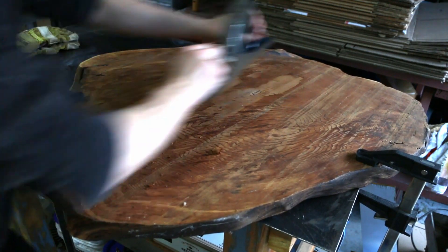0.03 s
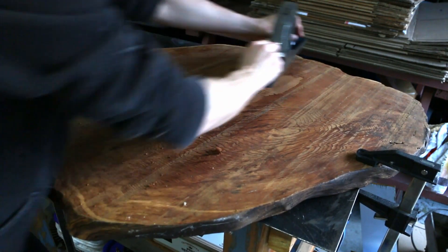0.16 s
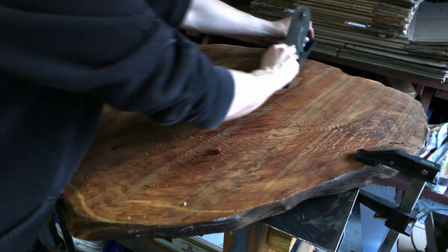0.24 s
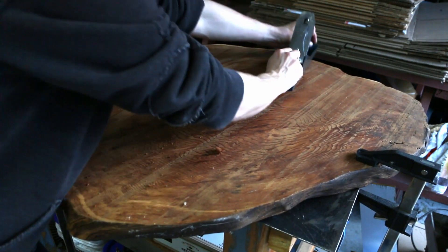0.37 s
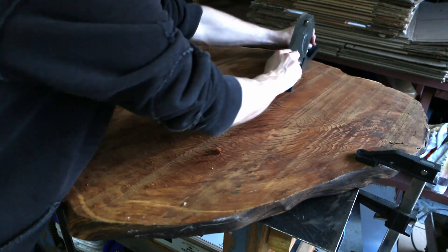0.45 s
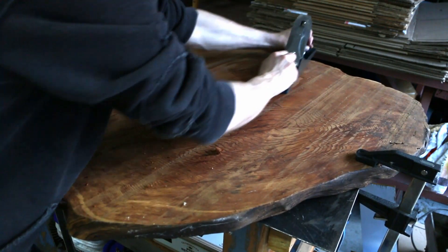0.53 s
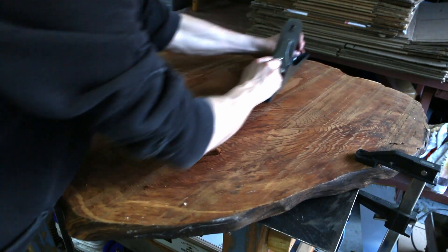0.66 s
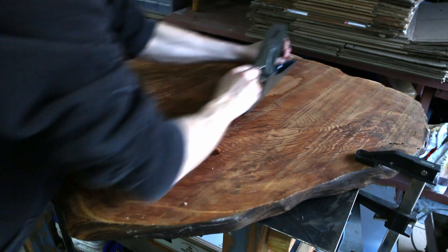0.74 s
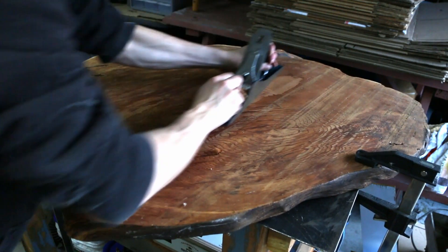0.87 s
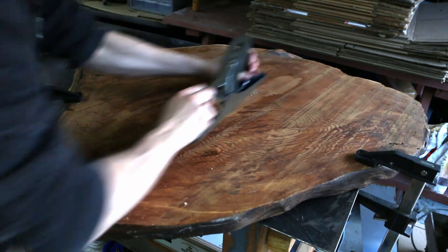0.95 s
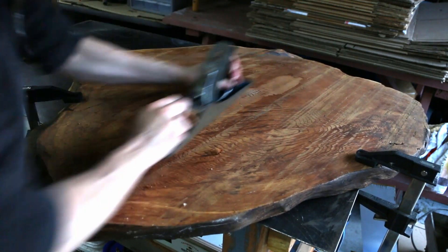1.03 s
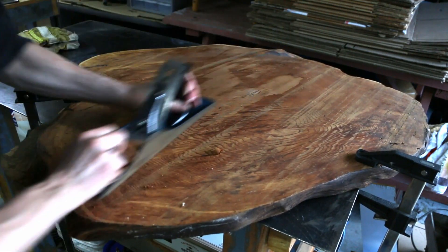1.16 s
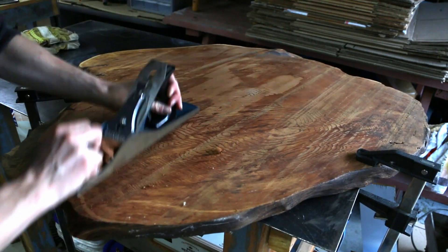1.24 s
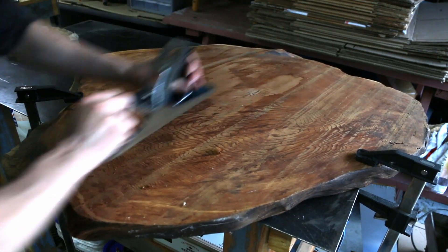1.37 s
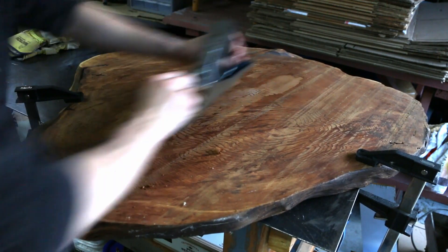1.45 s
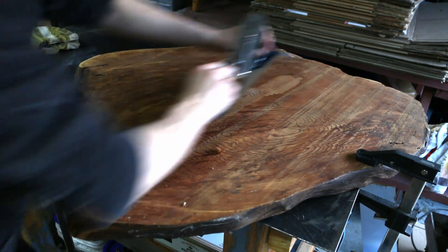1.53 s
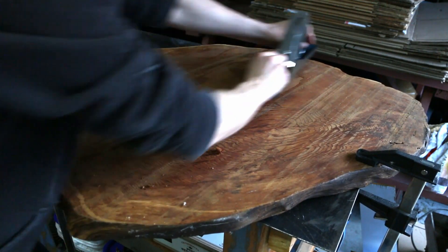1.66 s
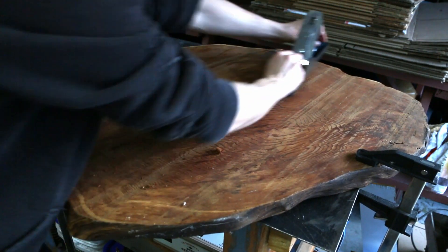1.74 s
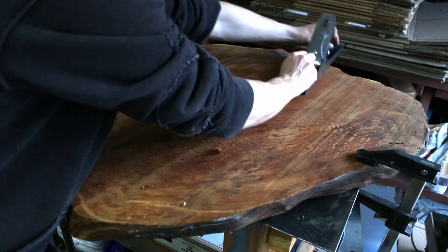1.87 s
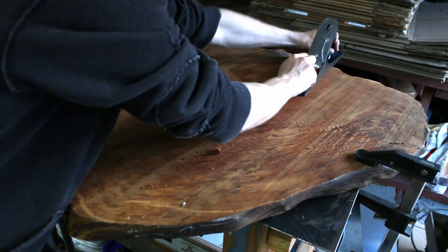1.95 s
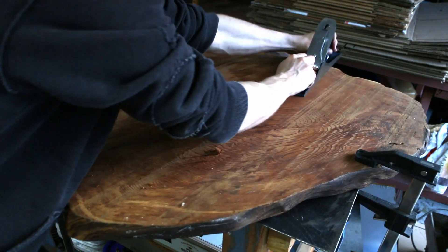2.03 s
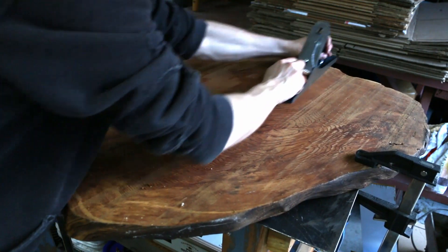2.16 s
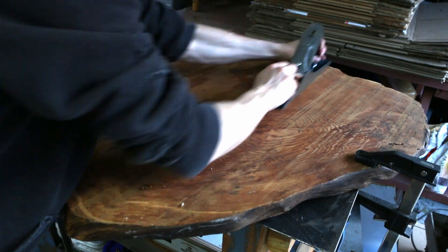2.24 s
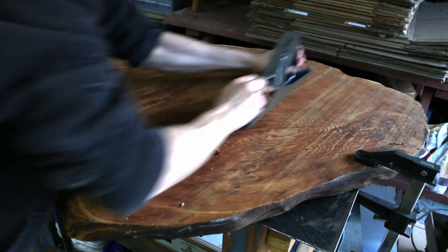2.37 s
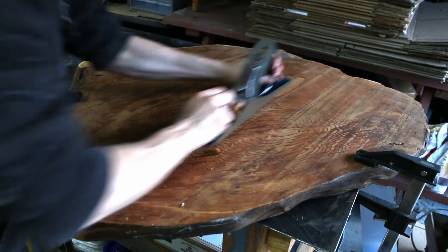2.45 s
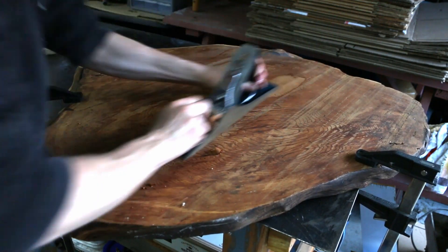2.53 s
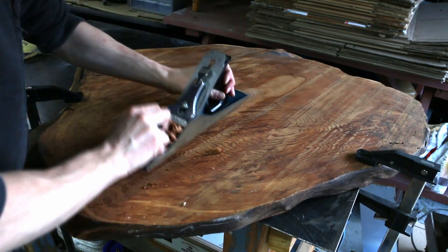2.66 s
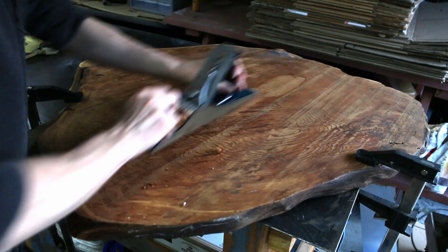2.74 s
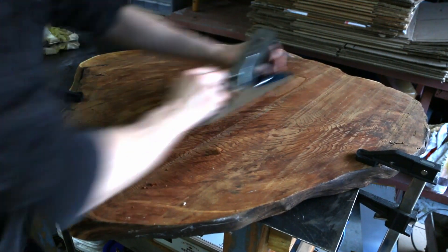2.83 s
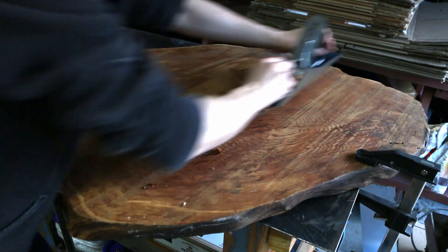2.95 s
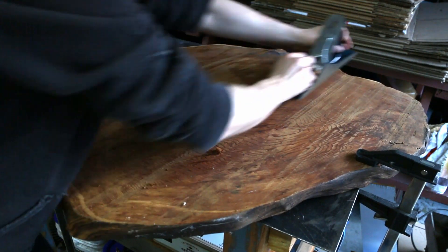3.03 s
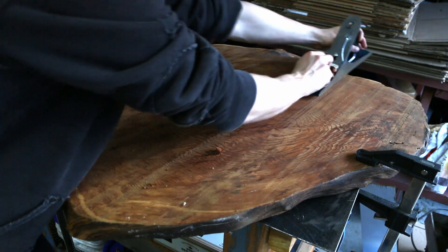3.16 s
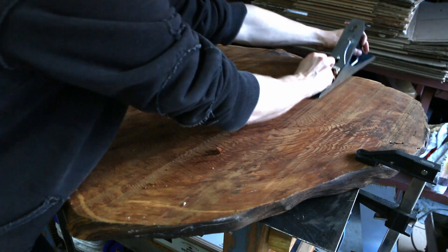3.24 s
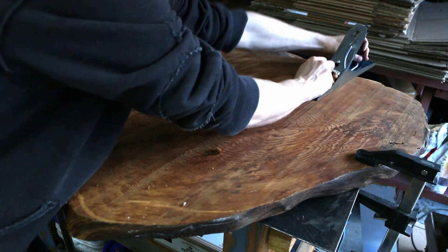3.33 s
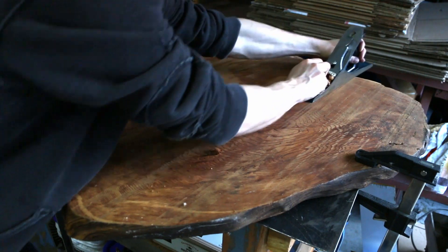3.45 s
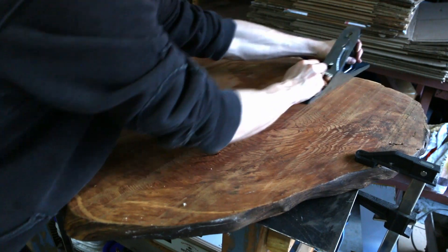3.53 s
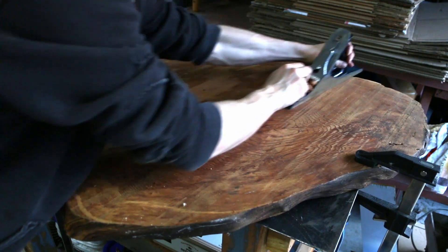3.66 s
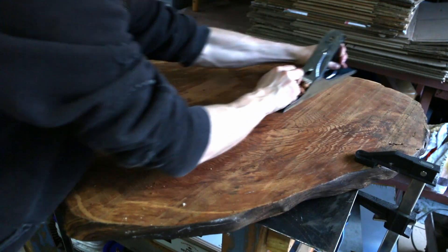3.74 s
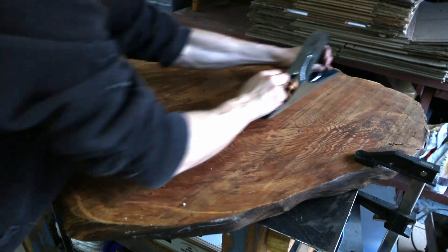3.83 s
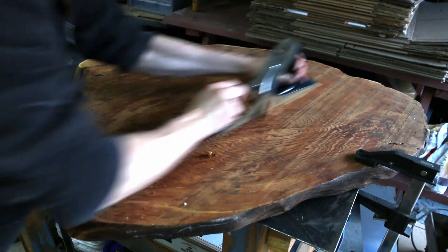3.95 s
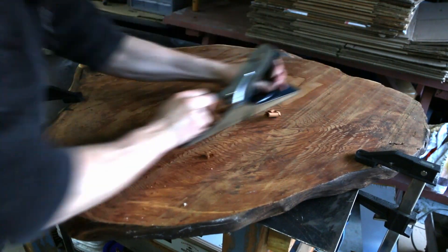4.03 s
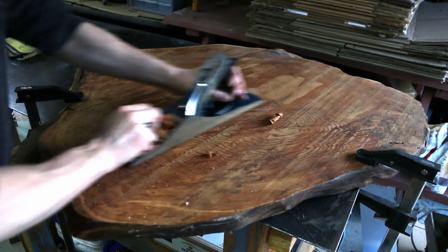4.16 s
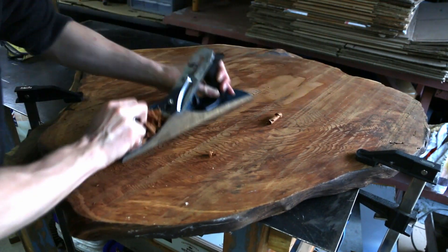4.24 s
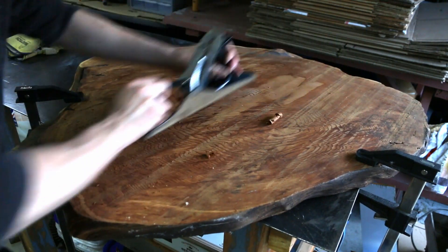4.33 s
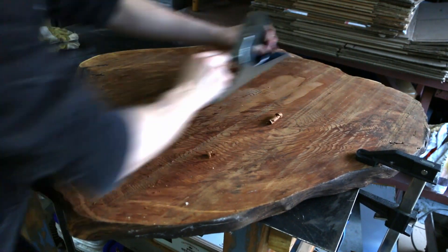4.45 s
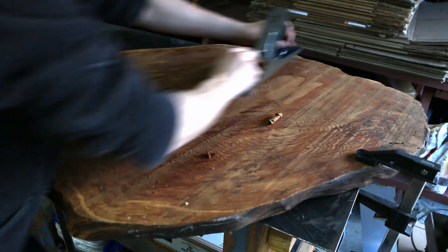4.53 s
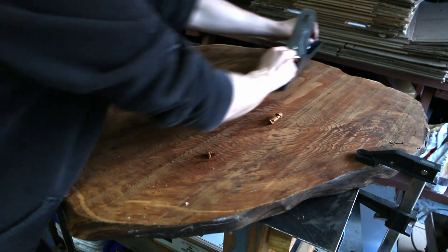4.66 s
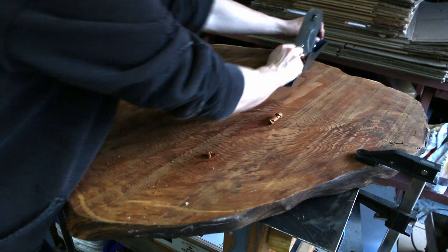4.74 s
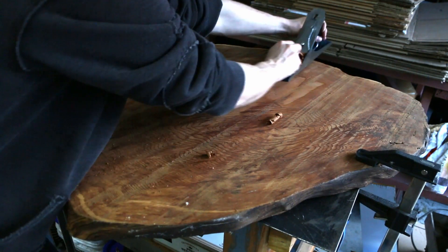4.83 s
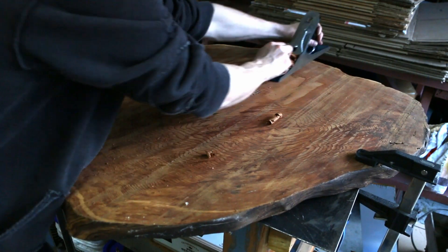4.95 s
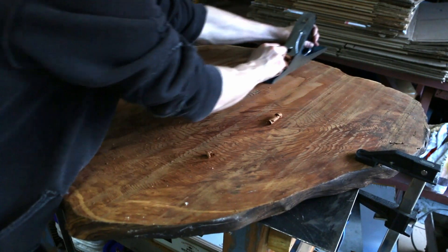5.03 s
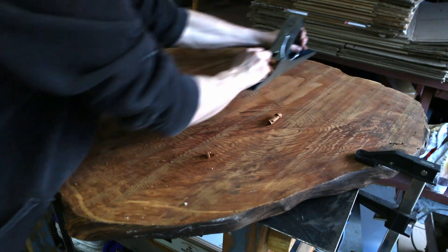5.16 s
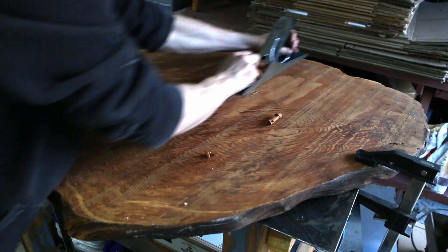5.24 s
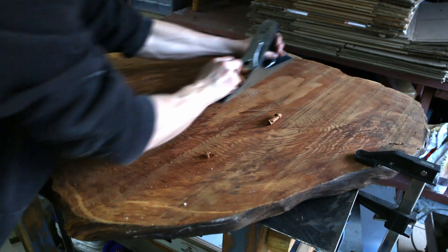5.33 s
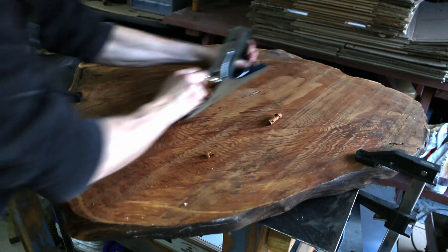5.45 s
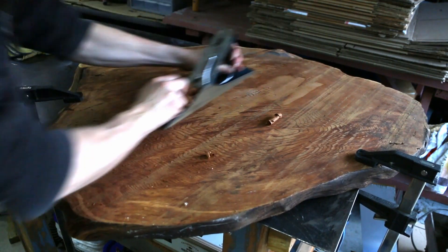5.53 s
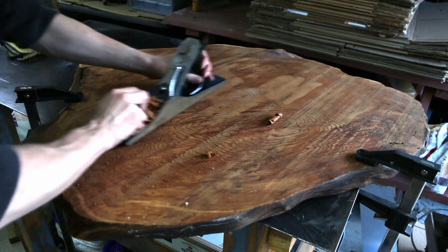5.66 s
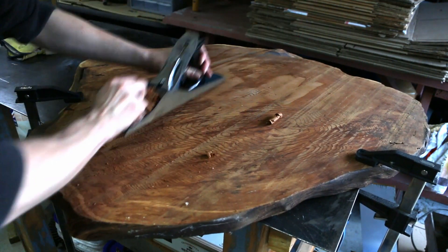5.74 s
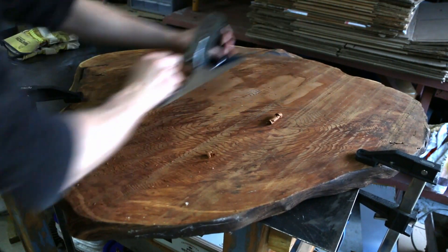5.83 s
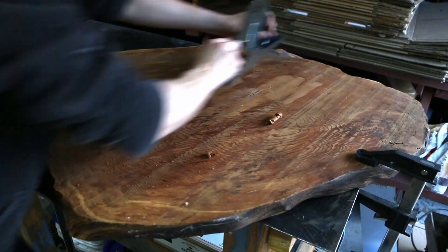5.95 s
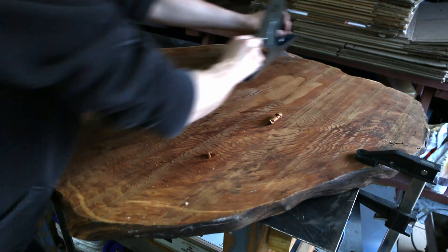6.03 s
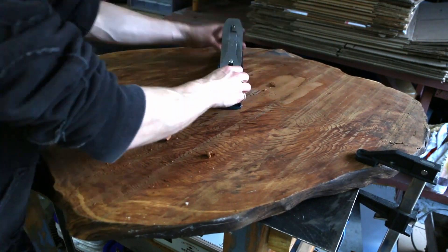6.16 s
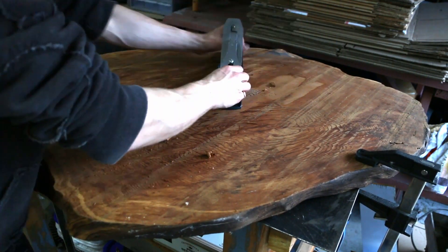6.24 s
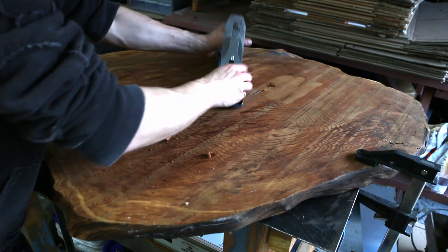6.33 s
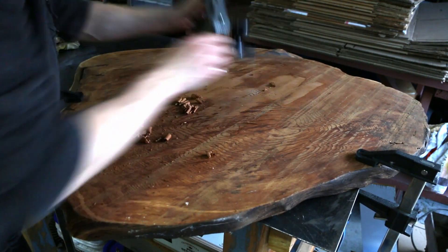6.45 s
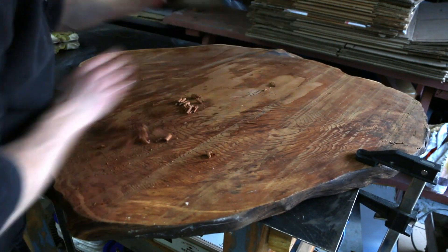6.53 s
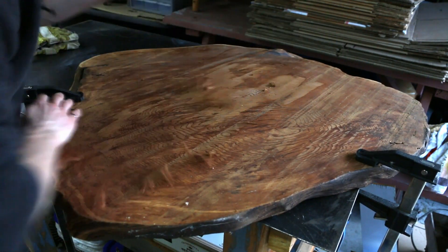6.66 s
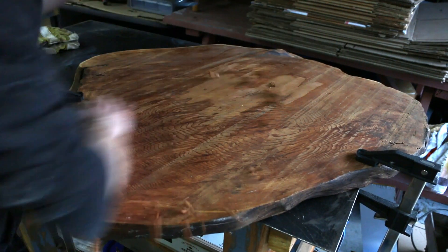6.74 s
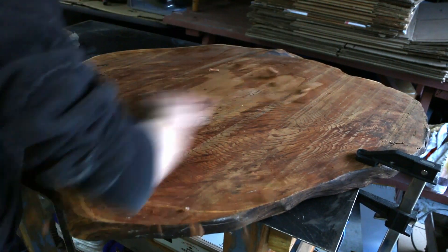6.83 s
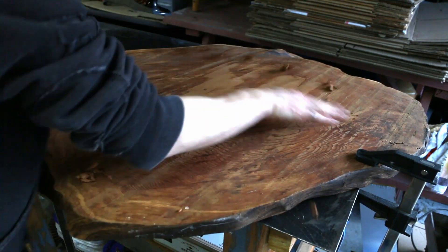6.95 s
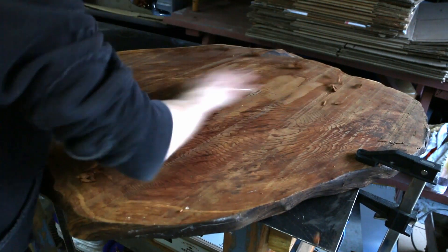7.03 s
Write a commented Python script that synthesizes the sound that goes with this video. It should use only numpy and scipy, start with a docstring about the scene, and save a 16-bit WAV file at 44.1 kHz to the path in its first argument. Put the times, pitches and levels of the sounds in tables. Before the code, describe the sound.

In a small, quiet workshop, an iron hand plane lands on a thick wooden slab with a knock and is pushed across the grain, rasping and hissing. Three more landings and strokes follow at an even pace, the blade chattering at times and snagging once. The plane is put aside with a duller knock and a hand briefly sweeps away the shavings. Heard close, in stereo.

```python
"""A small, quiet workshop; a stereo pair close to a thick wooden slab clamped on its stand.
First come soft rustles and a murmur from the stand. A cast-iron hand plane lands with a knock and is
pushed across the grain: fibres tear, the slab drones, the shaving hisses. Three more landings and
pushes follow, now with the blade chattering and once snagging. Last, the plane is put aside and a hand
sweeps the shavings off."""
import sys
import numpy as np
from scipy import signal
from scipy.fft import rfft, irfft, next_fast_len
from scipy.io import wavfile

SR = 44100
rng = np.random.default_rng(int(sys.argv[2]) if len(sys.argv) > 2 else 0)


def output_pcm(signal):
    """Save a mono or channel-first signal as 16-bit PCM at the path in sys.argv[1].

    Samples are clipped to [-1, 1] before scaling.
    """
    pcm = np.clip(np.atleast_2d(signal).T, -1, 1) * 32767
    wavfile.write(sys.argv[1], SR, np.round(pcm).astype(np.int16))


N = 312669
TIME = np.arange(N) / SR

# room tone, the still air of the workshop: (frequency [Hz], level [dB])
ROOM_TONE = [(12, -26), (20, -1.5), (87, -5), (245, -9.5), (404, -5), (767, -10.5), (1010, -8), (1200, -15),
             (1380, -12), (1720, -14), (5850, -17.5), (13500, -21), (15500, -24.5)]
# shifts of weight that bump the stand: (time [s], level [dB])
STAND_BUMPS = [(0.0, -52.5), (0.075, -59), (0.14, -66), (0.235, -63), (1.43, -56), (1.581, -64),
               (4.48, -59.5), (4.6, -59.5), (4.86, -54), (6.36, -60)]
# the slab on its stand: (frequency [Hz], width [Hz], level [dB])
STAND_MODES = [(124, 20, 0.5), (258, 135, 3), (544, 280, -12), (960, 250, -6.5)]
# soft, brief rustles and swishes between the cuts: (middle [s], length [s], level [dB])
SOFT_RUSTLES = [(0.04, 0.11, -62), (0.164, .1, -66.5), (1.88, 0.15, -69), (3.057, 0.084, -59.5),
                (3.264, 0.18, -61), (3.427, 0.29, -62), (4.8, 0.21, -64), (5.056, 0.18, -55),
                (6.457, 0.1, -62)]
# their colour: (frequency [Hz], level [dB])
RUSTLE_SPECTRUM = [(150, -19), (700, 0.5), (1300, -1.5), (2400, 2), (4000, -3.5), (6500, -10),
                   (10000, -14.5), (15000, -25)]
# the plane's body: (frequency [Hz], width [Hz], level [dB])
BODY_MODES = [(1188, 72, 1.5), (1293, 100, -2), (1389, 82, 1.5), (1530, 70, -5.5), (1660, 93, -0.5),
              (1900, 19, -1), (2017, 60.2, 0), (2212, 70, 0), (2392, 110, -3.5), (2558, 120, -2),
              (2688, 150, -7)]

# knocks on the slab: the plane landing, and one sharp snag of the blade mid-push:
# (time [s], blow [dB], brightness [Hz], boom [dB], thud [dB], clack [dB])
SLAB_KNOCKS = [(0.3606, -10, 4900, 3.5, 4, -2.5), (0.417, 0.5, 3000, 0, -1.5, -2),
               (1.8288, -25, 1340, 8.5, 7, -5), (1.9583, 0, 2220, -8.5, -2, -3.5),
               (3.2856, -12, 1290, 9, 4.5, -0.5), (3.3332, -1, 1030, -7.5, -1.5, -2.5),
               (3.585, -24, 1110, -19, -12, 4), (4.7479, -33, 2800, 12, 10.5, -4),
               (4.848, -27, 2620, 12, 10, -2), (4.9365, -2, 2020, 3.5, -5, -2.5),
               (6.1958, -11.5, 1010, 9, -1.5, -20), (6.224, -16, 980, -3, -5, -13)]
# the struck slab and stand: (frequency [Hz], level [dB], t60 [s])
SLAB_MODES = [(103, -44.5, 0.54), (130.4, -34, 0.66), (185.3, -26, 0.23), (241.5, -18.5, 0.14),
              (291.5, -14, 0.19), (348.5, -17.5, 0.18), (460, -28.5, 0.29), (533, -26.5, 0.16),
              (610, -26, .2), (791, -29.5, 0.13), (815, -19, 0.14), (873, -12, .14), (970, -15, 0.087),
              (1083, -20.5, 0.22), (1135, -21.5, 0.13), (1244, -25.5, 0.25), (1291, -23, 0.14),
              (1492, -28.5, 0.18), (1524, -33.5, 0.14), (1588, -34, 0.11), (1624, -26, 0.15),
              (1840, -27, 0.13), (2134, -21, 0.065), (2246, -22, 0.086), (2280, -36.5, 0.11),
              (2496, -26, .13), (2770, -22, 0.074), (3510, -21, 0.072), (3630, -22, 0.045)]
# the first snap of iron on wood: (frequency [Hz], level [dB], t60 [s])
SNAP_MODES = [(709, -9, 0.006), (1250, -4, 0.0025), (2100, -5, 0.0025)]
# the slab's crowded upper modes: (frequency [Hz], level [dB])
DENSE_SPECTRUM = [(70, -29.5), (200, 2), (400, -3), (900, -2.5), (1500, -4.5), (2300, -3.5), (3400, -3),
                  (4600, -8), (7000, -14), (15000, -22)]
# their decay: (frequency [Hz], t60 [s])
DENSE_T60 = [(100, 0.13), (600, 0.33), (2000, 0.14), (5000, 0.044), (12000, .08)]

# how hard the edge bites, one curve a push: (time [s], level [dB])
BITE_CURVES = [
    [(0.55, -45), (0.666, -41.5), (0.956, -39.5), (1.004, -36.5), (1.044, -40.5), (1.098, -37), (1.12, -44),
     (1.198, -41.5), (1.33, -68)],
    [(2.085, -47), (2.091, -45.5), (2.147, -37.5), (2.301, -36.5), (2.583, -43), (2.647, -50), (2.74, -80)],
    [(3.43, -51.5), (3.54, -47.5), (3.584, -37), (3.736, -40), (3.86, -37.5), (3.95, -39), (4.004, -34.5),
     (4.16, -42), (4.26, -71)],
    [(5.1, -56.5), (5.284, -46.5), (5.332, -42), (5.416, -43), (5.472, -39), (5.578, -46.5), (5.612, -45),
     (5.664, -48.5), (5.76, -79)],
]
# each push, with drone, scrape and hiss relative to the bite:
# (lift-off [s], jolt [dB], drone [dB], scrape [dB], scrape lost from start to end [dB], hiss [dB])
PUSH_SETTINGS = [(1.225, -51, -10.5, -4.5, 3.5, -7), (2.68, -57, -8, -5.5, 6, -5.5),
                 (4.15, -46.5, -10.5, -1.5, 5.5, -8.5), (5.65, -60, -13.5, -6, 4.5, -6)]
# what the drag rings in the slab: (frequency [Hz], width [Hz], level [dB])
DRAG_MODES = [(123, 13, -6), (200, 32, -8), (301, 93, -4), (348, 68, -12.5)]
# what it rings under the sole: (frequency [Hz], width [Hz], level [dB])
SCRAPE_MODES = [(482.8, 57, 0.5), (524, 58, 1.5), (634, 47, 1.5), (712, 20, 0), (819, 140, 0),
                (904, 100, -3), (1013, 43, -2)]
# tearing fibres: (frequency [Hz], level [dB])
TEAR_SPECTRUM = [(100, -30), (400, -21.5), (800, -2.5), (1300, 2), (1900, 2.5), (2600, 3.5), (3500, -3.5),
                 (4200, -6.5), (6000, -9.5), (15000, -38.5)]
# the shaving peeling off: (frequency [Hz], level [dB])
HISS_SPECTRUM = [(1500, -33), (3500, -5), (5000, -1), (6200, -7), (7200, -6), (9500, -6.5), (12500, -10),
                 (15500, -14.5)]
# thin ring of the steel blade: (frequency [Hz], width [Hz], level [dB])
BLADE_OVERTONES = [(5085, 130, -5), (5155, 200, -1), (6150, 150, -0.5), (7870, 170, -2), (8350, 130, -3.5),
                   (9100, 150, -6), (10400, 240, -8), (12430, 170, -12.5), (14500, 350, -16.5)]
# the cap iron: (frequency [Hz], width [Hz], level [dB])
CAP_IRON_MODES = [(3195, 60, -0.5), (3390, 190, -2), (3755, 100, -2), (3950, 55, -12)]
# the blade catches: (time [s], length [s], level [dB], ring [Hz], width [Hz], slip rate [1/s])
JUDDERS = [(2.17, 0.08, -43.5, 279, 50, 132), (2.27, 0.089, -39, 287, 40, 152),
           (2.3, 0.027, -33.5, 620, 415.5, 160), (3.584, 0.017, -35, 700, 376, 150),
           (3.708, 0.027, -33, 576, 209.8, 110), (3.82, 0.1, -41.5, 2450, 900, 330),
           (3.965, 0.062, -36.5, 1180, 160, 300), (4.001, 0.018, -34, 1180, 75, 380),
           (4.059, 0.033, -44, 292, 60, 185), (5.437, .07, -40.5, 2160, 700, 330)]

# the hand clears the shavings: (middle [s], length [s], rub [dB], rustle [dB])
HAND_SWEEPS = [(6.607, 0.062, -68, -64), (6.697, 0.23, -58.5, -62), (6.788, 0.031, -48.5, -67),
               (6.875, 0.11, -61, -55)]
# a palm rubbing on wood: (frequency [Hz], level [dB])
PALM_SPECTRUM = [(150, -21), (700, -5.5), (1200, 4), (2100, 1), (3500, -5), (6000, -26), (15000, -35)]
# dry curls sliding over each other: (frequency [Hz], level [dB])
CURL_SPECTRUM = [(1500, -17.5), (3500, -7), (5500, -4.5), (7500, -7.5), (10500, -8.5), (15500, -15)]

# reflections off near surfaces: (delay [s], level [dB])
NEAR_ECHOES = [(.0038, -14), (.0058, -18.5), (0.0119, -18), (0.0132, -16), (.0172, -20)]
# the workshop's reverberation: (frequency [Hz], t60 [s])
REVERB_T60 = [(100, 0.96), (300, 0.34), (1000, 0.49), (3000, 0.25), (12000, 0.19)]
# how alike the two microphones hear noise: (frequency [Hz], correlation [0-1])
MIC_LIKENESS = [(25, .4), (60, .85), (120, .97), (250, .96), (500, .87), (1000, .76), (2000, .76),
                (4000, .42), (8000, .2), (14000, 0)]
# lean of the pair: (frequency [Hz], left minus right [dB])
MIC_BALANCE = [(100, -3), (1000, -1.5), (2500, -4), (4500, -2.5), (8000, -2), (13000, -0.2)]


def from_db(db):
    """Decibels to gain."""
    return 10 ** (np.asarray(db) / 20)


def unit_rms(x):
    """Scale to rms 1."""
    return x / np.sqrt(np.mean(x ** 2) + 1e-20)


def at_hz(points, hz):
    """Read a table on a log-frequency axis."""
    f, value = np.transpose(points)
    return np.interp(np.log(np.maximum(hz, 1)), np.log(f), value)


def at_bins(points, size):
    """Read a table at each bin of an FFT."""
    return at_hz(points, np.arange(size // 2 + 1) * SR / size)


def colour(x, spectrum):
    """Give a signal a spectrum; rms 1."""
    size = next_fast_len(x.shape[-1])
    gain = from_db(at_bins(spectrum, size))
    return unit_rms(irfft(rfft(x, size) * gain, size)[..., :x.shape[-1]])


def stereo_noise(length):
    """White noise as the pair hears it: alike in the bass, unrelated in the treble."""
    size = next_fast_len(length)
    alike = at_bins(MIC_LIKENESS, size)
    mid, side = rfft(rng.standard_normal((2, size)))
    left_right = np.sqrt(1 + alike) * mid + np.sqrt(1 - alike) * side * [[1], [-1]]
    return unit_rms(irfft(left_right, size)[:, :length])


def drift(rate_hz):
    """A smooth random wander; rms 1."""
    knots = rng.standard_normal(N // 40)
    return unit_rms(np.interp(TIME * rate_hz, np.arange(len(knots)), knots))


def resonate(x, modes):
    """Parallel resonances, each applied twice for steep flanks; rms 1."""
    out = 0
    for hz, width, db in modes:
        r = np.exp(-np.pi * width / SR)
        section = [(1 - r * r) / 2, 0, (r * r - 1) / 2, 1, -2 * r * np.cos(2 * np.pi * hz / SR), r * r]
        out = out + from_db(db) * signal.sosfilt([section, section], x + 1e-18)
    return unit_rms(out)


def struck(modes, t):
    """One dying sine a mode; neighbours swing opposite ways."""
    hz, db, t60 = np.transpose(modes)[:, :, None]
    waves = from_db(db) * np.sin(2 * np.pi * hz * t) * from_db(-60 * t / t60)
    waves[1::2] *= -1
    return waves


def dying_noise(spectrum, t60s, length):
    """Countless modes struck at once, each octave dying at its own pace."""
    rest = colour(stereo_noise(length), spectrum)
    out = 0
    for hz in np.geomspace(100, 12800, 8):
        band = signal.sosfiltfilt(signal.butter(3, hz * np.sqrt(2), fs=SR, output="sos"), rest)
        rest = rest - band
        out = out + band * from_db(-60 * TIME[:length] / at_hz(t60s, hz))
    return out


def grains(per_s, grain_db, rough_db, rough_hz):
    """Fibres snap in clumps: separate cracks over a bed of countless tiny ones."""
    sizes = from_db(3.17 * np.minimum(rng.exponential(1, N), 4)) * rng.choice([-1, 1], N)
    snaps = unit_rms(sizes * (rng.random(N) < per_s / SR))
    return (stereo_noise(N) + from_db(grain_db) * snaps) * from_db(rough_db * drift(rough_hz))


def swell(middle_s, length_s):
    """A smooth rise and fall, length_s wide at half its height."""
    return np.exp2(-np.minimum(np.abs(2 * (TIME - middle_s) / length_s), 10) ** 2)


def shove(start_s, t60, attack_s=0.0064):
    """A quick rise, then a steady dying away."""
    t = np.maximum(TIME - start_s, 0)
    return (1 - np.exp(-t / attack_s)) * from_db(-60 * t / t60)


def add(out, start_s, sound):
    """Mix a sound in at a time."""
    i = round(start_s * SR)
    out[:, i:i + sound.shape[-1]] += sound[..., :N - i]


def room_tone(level_db=-63):
    """The workshop's still air, steady at both microphones."""
    return from_db(level_db) * colour(stereo_noise(N), ROOM_TONE)


def stand_murmur(rest_db=-76, rock_db=-61.5, lumpy_db=3.0):
    """The slab murmurs on its stand, bumped by shifts of weight and rocking after each lift-off."""
    rocking = from_db(rock_db) * sum(shove(lift_s, t60=1.26) for lift_s, *_ in PUSH_SETTINGS)
    bumps = sum(from_db(db) * shove(s, t60=0.48) for s, db in STAND_BUMPS)
    shaking = stereo_noise(N) * from_db(lumpy_db * drift(35))
    return (from_db(rest_db) + rocking + bumps) * resonate(shaking, STAND_MODES)


def rustles():
    """Soft, brief rustles and swishes between the cuts, with a faint ring in them."""
    swish = stereo_noise(N) * from_db(2.44 * drift(40))
    level = sum(from_db(db) * swell(s, length) for s, length, db in SOFT_RUSTLES)
    ring = from_db(-10) * resonate(swish[0], BODY_MODES)
    return level * unit_rms(colour(swish, RUSTLE_SPECTRUM) + ring)


def knocks(modes_db=-3.0, dense_db=-15.5, echo_db=4.0, room_db=-24.0, vary_db=2.0, rise_cycles=1.9):
    """Each knock rings the slab, coloured by where it hits; a softer contact leaves out treble."""
    out, size = np.zeros((2, N)), SR * 2 // 3
    t, hz = TIME[:size], np.array(SLAB_MODES)[:, :1]
    swing_up = 1 - np.exp(-hz * t / rise_cycles)   # each mode takes a few cycles to swell up
    modes = from_db(modes_db) * struck(SLAB_MODES, t) * swing_up
    snap = struck(SNAP_MODES, t).sum(0)
    crack = snap.copy()
    for delay, db in NEAR_ECHOES:
        lag = round(delay * SR)
        crack[lag:] += from_db(db + echo_db) * snap[:-lag]
    room = from_db(room_db) * dying_noise(DENSE_SPECTRUM, REVERB_T60, size) * np.minimum(t / 0.016, 1)
    for s, blow_db, bright_hz, boom_db, thud_db, clack_db in SLAB_KNOCKS:
        spot = [(135, boom_db), (200, thud_db), (360, thud_db), (470, 0),
                (700, 0), (830, clack_db), (1350, clack_db), (1800, 0)]
        weights = from_db(at_hz(spot, hz) + vary_db * rng.standard_normal(hz.shape))
        ring = crack + (weights * modes).sum(0) + room
        ring[:, :size // 2] += from_db(dense_db) * dying_noise(DENSE_SPECTRUM, DENSE_T60, size // 2)
        contact = signal.butter(2, bright_hz, fs=SR, output="sos")
        add(out, s, from_db(blow_db) * signal.sosfilt(contact, ring))
    # the knocks carry no deep bass below about 90 Hz
    return signal.sosfilt(signal.butter(8, 90, "high", fs=SR, output="sos"), out + 1e-18)


def push(bite, settings, attack_s=0.011, release_s=0.034, usual_db=-40.5, slow_loss_db=10):
    """Gains of drone, scrape, tear and hiss through one push; all follow the bite of the edge."""
    s, db = np.transpose(bite)
    lift_s, jolt_db, drone_db, scrape_db, scrape_loss_db, hiss_db = settings
    bite_db = np.interp(TIME, s, db)
    before, after = np.minimum(TIME - s[0], 0), np.maximum(TIME - s[-1], 0)
    touching = np.exp(np.maximum(before / attack_s - after / release_s, -20))
    along = np.interp(TIME, [s[0], s[-1]], [0, 1])
    speed = np.sin(np.pi * np.interp(along, [0, 0.56, 1], [0, 0.5, 1]))   # fastest just past halfway
    drone = from_db(usual_db + 0.7 * (bite_db - usual_db) + drone_db)   # follows only part of the swing
    jolt = from_db(jolt_db) * swell(lift_s, length_s=0.056)
    scrape = from_db(bite_db + scrape_db - scrape_loss_db * (along - 0.5))   # weight leaves the nose
    hiss = from_db(bite_db + hiss_db - slow_loss_db * (1 - speed))
    return touching * np.array([drone + jolt, scrape, from_db(bite_db), hiss])


def planing(flutter_db=1.3, flutter_hz=45):
    """The edge tears fibres: the drag shakes the slab, the snaps ring the iron, the shaving hisses."""
    drone, scrape, tear, hiss = sum(push(bite, row) for bite, row in zip(BITE_CURVES, PUSH_SETTINGS))
    fibres = grains(per_s=900, grain_db=-9.0, rough_db=0.1, rough_hz=159)
    friction = grains(per_s=400, grain_db=0.0, rough_db=0.45, rough_hz=115.7)
    slab = from_db(-1.0) * drone * resonate(fibres, DRAG_MODES)
    sole = from_db(-1.94) * scrape * resonate(friction, SCRAPE_MODES)
    body = from_db(-0.5) * resonate(friction, BODY_MODES)
    rasp = from_db(-1.5) * tear * unit_rms(colour(fibres, TEAR_SPECTRUM) + body)
    blade = from_db(-7.0) * resonate(friction, BLADE_OVERTONES)
    shaving = from_db(-1.13) * hiss * unit_rms(colour(fibres, HISS_SPECTRUM) + blade)
    # the cap iron sings most when a full shaving curls over it
    cap = from_db(-7.0) * np.sqrt(tear * hiss) * resonate(friction, CAP_IRON_MODES)
    flutter = from_db(flutter_db * drift(flutter_hz))   # hard and soft growth rings pass under the edge
    return slab + sole + flutter * (rasp + cap + shaving)


def chatter(jitter=0.045):
    """A short run of nearly even slips rings the blade against the wood."""
    out, size = np.zeros((2, N)), SR // 4
    for s, length, db, hz, width, rate in JUDDERS:
        slip_s = np.cumsum(np.exp(jitter * rng.standard_normal(40))) / rate
        slip_s = slip_s - slip_s[0]
        slip_s = slip_s[slip_s < length]
        slips = np.zeros(size)
        slips[(slip_s * SR).astype(int)] = rng.uniform(0.75, 1, len(slip_s))
        add(out, s, from_db(db) * np.sqrt(length * SR / size) * resonate(slips, [(hz, width, 0)]))
    return out


def sweeping():
    """The palm rubs over the wood and dry curls rustle ahead of it."""
    rub = sum(from_db(db) * swell(s, length) for s, length, db, _ in HAND_SWEEPS)
    rustle = sum(from_db(db) * swell(s, length) for s, length, _, db in HAND_SWEEPS)
    crackle = grains(per_s=320, grain_db=-19, rough_db=1.4, rough_hz=70.8)
    palm = from_db(-3.0) * rub * colour(crackle, PALM_SPECTRUM)
    curls = from_db(0.1) * rustle * colour(crackle, CURL_SPECTRUM)
    return palm + curls


def workshop(x, wet_db):
    """The direct sound reaches the microphones first, then near echoes and a diffuse tail."""
    size = SR // 2
    onset = np.clip(TIME[:size] / 0.0046 - 1, 0, 1)
    tail = dying_noise([(100, 1.8), (15000, 2.7)], REVERB_T60, size) * onset
    response = from_db(wet_db) * tail / np.sqrt(np.sum(tail ** 2) / 2)
    for delay, db in NEAR_ECHOES:
        response[:, round(delay * SR)] += from_db(db)
    return x + signal.fftconvolve(x, response, axes=1)[:, :N]


def scene():
    """The work at the slab from close by, over room tone; the knocks carry their own reflections."""
    work = workshop(planing() + chatter() + sweeping() + rustles(), wet_db=-13.0)
    return knocks() + work + stand_murmur() + room_tone()


def record(dry):
    """The right microphone is a little louder; the top is cut steeply at 15.75 kHz."""
    size = next_fast_len(N + SR // 4)
    lean_db = at_bins(MIC_BALANCE, size) * [[0.5], [-0.5]]
    heard = irfft(rfft(dry, size) * from_db(lean_db), size)[:, :N]
    return signal.sosfilt(signal.ellip(12, 0.1, 80, 15750, fs=SR, output="sos"), heard)


dry = scene()
out = record(dry)
output_pcm(out)
```